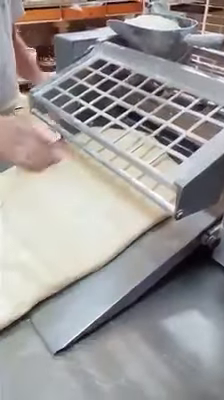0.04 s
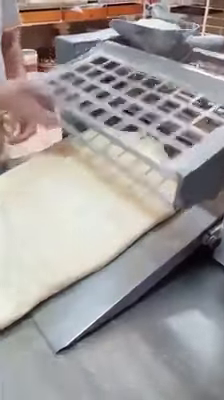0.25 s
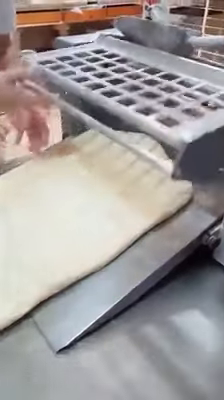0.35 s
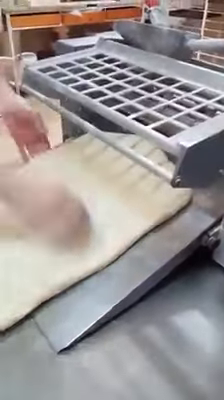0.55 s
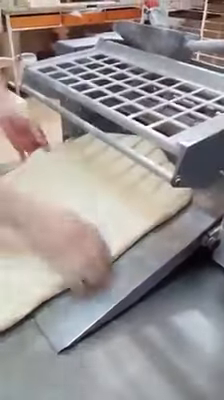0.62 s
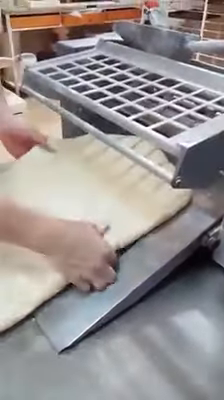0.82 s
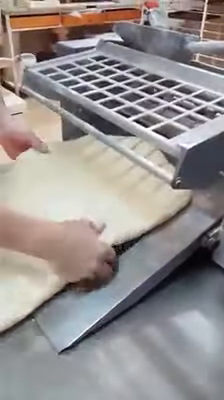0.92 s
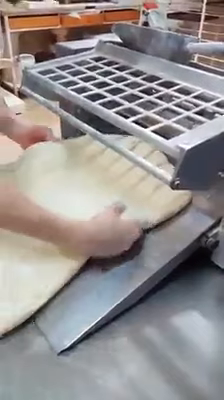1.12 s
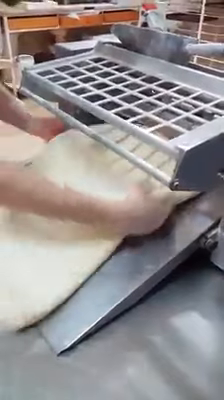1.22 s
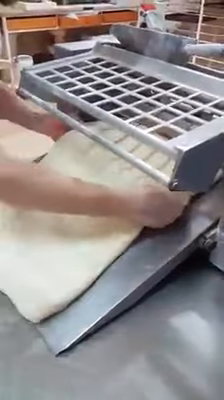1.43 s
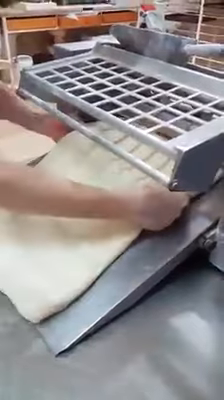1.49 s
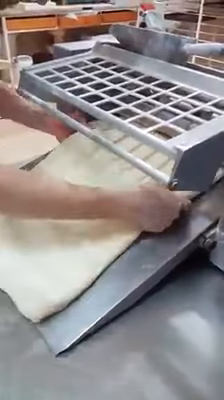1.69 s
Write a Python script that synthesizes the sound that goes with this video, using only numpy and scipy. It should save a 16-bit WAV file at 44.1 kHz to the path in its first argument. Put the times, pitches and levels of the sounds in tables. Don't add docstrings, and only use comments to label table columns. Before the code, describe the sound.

Sharp metal clang with quick rattling bounces over the low rumble and hiss of a dough-rolling machine, then soft dough sliding, a knock, a distant clink and a light tap; live hard room, phone a pace or two away.

```python
import sys
import numpy as np
from scipy import signal
from scipy.fft import rfft, irfft, dct
from scipy.io import wavfile

SR = 44100
rng = np.random.default_rng(int(sys.argv[2]) if len(sys.argv) > 2 else 0)


def to_wav(s):
    ch = np.atleast_2d(s).T
    pcm = np.round(np.clip(ch, -1, 1) * 32767)
    wavfile.write(sys.argv[1], SR, pcm.astype(np.int16))


def ratio_of_db(decibels):
    return 10 ** (np.asarray(decibels, float) / 20)


N = 77175
T = np.arange(N) / SR
F = np.fft.rfftfreq(N, 1 / SR) + 1e-3
LR = np.array([[1], [-1]])

KNOCK_S, TAP_S, TAP_DB = 1.3135, 1.501, -6
CLINK_S = 1.4165


def unit(x):
    return x / np.sqrt(np.mean(x ** 2))


def colour(x, points):
    hz, db = np.array(points).T
    return irfft(rfft(x) * ratio_of_db(np.interp(np.log(F), np.log(hz), db)), N)


def resonance(hz, width_hz):
    return 1 / (1 + 1j * (F - hz ** 2 / F) / width_hz) ** 2


def band(x, hz, width_hz):
    return irfft(rfft(x) * resonance(hz, width_hz), N)


def walk(rate_hz):
    spectrum = rfft(rng.standard_normal(N)) * (F > 0.1) / (1 + (F / rate_hz) ** 2)
    return unit(irfft(spectrum, N))


def pair(side_gain):
    mid, side = rng.standard_normal((2, N))
    return mid + LR * irfft(rfft(side) * side_gain, N)


def burst(at_s, len_s, rise=0.12):
    t = np.maximum(T - at_s, 0) / max(len_s, 1e-4)
    return (1 - np.exp(-t / rise)) * np.exp(-t)


def ring(t, hz, t60):
    return np.sin(2 * np.pi * hz * t) * 1000.0 ** (-t / t60)


def motor():
    # (frequency [Hz], level [dB])
    tones = [(98, -56), (113, -58), (151, -53.5), (199, -50.5), (301, -48.5), (350, -48), (432, -51.5),
             (576, -55), (598, -51), (630, -50), (764, -53.5), (830, -55.5), (881, -53)]
    # (frequency [Hz], width [Hz], level [dB])
    housing = [(104, 210, -18), (217.5, 154, -3.5), (373, 125, 1), (625, 296, -2.5), (782, 56, -6),
               (932, 218, -5.5)]
    # (time [s], level [dB], lean to the left [dB])
    load = [(0, 1.5, 1.5), (0.148, 1, 3), (.3, 4, 0), (.75, 2, -2.5), (.95, 1, -0.5), (1.03, 0, 1),
            (1.32, 4, -0.5), (1.5, 1.5, 2), (1.57, -0.5, 3.5), (1.658, 0.5, -1), (1.75, -1.5, 3.5)]
    wobble_db, wobble_hz, drift_rad, tone_side_db = 3.5, 7, 0.9, -21.5
    rumble_db, rumble_side_db, flicker_db = -41.5, -11.5, 1

    hum = 0
    for hz, db in tones:
        phase = 2 * np.pi * hz * T + drift_rad * walk(wobble_hz)
        size = np.sqrt(2) * ratio_of_db(db + wobble_db * walk(wobble_hz))
        side = ratio_of_db(tone_side_db) * np.sin(phase + 3 * walk(0.86))
        hum = hum + size * (np.sin(phase) + LR * side)

    rumble = 0
    for hz, width_hz, db in housing:
        noise = pair(ratio_of_db(rumble_side_db) * hz / 400)
        rumble = rumble + ratio_of_db(db + flicker_db * walk(18)) * unit(band(noise, hz, width_hz))

    s, db, lean_db = np.array(load).T
    load_db = np.interp(T, s, db) + LR * np.interp(T, s, lean_db) / 2
    return (hum + ratio_of_db(rumble_db) * rumble) * ratio_of_db(load_db)


def mesh():
    # (time [s], level [dB])
    swell = [(0, -52.5), (.14, -34.5), (.23, -38.5), (.6, -56), (.89, -45), (1.0, -41), (1.2, -45),
             (1.34, -34.5), (1.41, -43), (1.6, -43), (1.66, -34.5), (1.75, -40)]
    mesh_hz, drift_rad = 395.1, 0.4
    s, db = np.array(swell).T
    phase = 2 * np.pi * mesh_hz * T + drift_rad * walk(8)
    return np.sqrt(2) * ratio_of_db(np.interp(T, s, db)) * np.sin(phase)


def air():
    # (frequency [Hz], density [dB per Hz])
    hiss_colour = [(25, 10.5), (1000, -5.5), (1400, -2), (3300, -6), (6300, -18), (8000, -27),
                   (12300, -34.5), (14200, -54)]
    # (frequency [Hz], level [dB], stop [s])
    whistle = (12200, -82, .4)
    hiss_db, side_hz, flicker_db = -47, 1540, 0.75
    noise = pair(np.minimum(F / side_hz, 1) ** 3.4)
    hiss = unit(colour(noise, hiss_colour)) * ratio_of_db(hiss_db + flicker_db * walk(14))
    hz, db, stop_s = whistle
    return hiss + ratio_of_db(db) * np.sin(2 * np.pi * hz * T) * (T < stop_s)


def swing():
    swing_s, len_s, swing_hz, swing_db = 0.255, 0.09, 2800, -51
    swish = band(rng.standard_normal(N), swing_hz, 4000)
    swish = unit(band(swish, swing_hz, 4000))
    return ratio_of_db(swing_db) * swish * burst(swing_s, len_s)


def boom(at_s):
    # (frequency [Hz], level [dB], t60 [s])
    modes = [(70.6, -15.5, 0.72), (117.3, -14.5, 0.67), (173, -5.5, 0.12), (252.4, 1.5, 0.19),
             (276, -11, .08), (342.7, 7, 0.068), (507, -13, 0.13), (650, -15.5, 0.11), (803, 0.5, 0.051),
             (890, -2, 0.071), (990, 3.5, 0.061)]
    slam_s, soften_db_per_s = 0.378, -110
    rise_s, scatter_db = 0.0052, 1
    t = np.maximum(T - at_s, 0)
    luck = rng.standard_normal(len(modes))
    soft_db = soften_db_per_s * max(at_s - slam_s, 0)
    out = 0
    for k, (hz, db, t60) in enumerate(modes):
        sign = (-1) ** (k // 2)
        mode_db = db + scatter_db * luck[k] + soft_db * max(np.log2(hz / 260), 0)
        out = out + sign * ratio_of_db(mode_db) * ring(t, hz, t60)
    return (1 - np.exp(-t / rise_s)) * out


def blows():
    # (time [s], crack [dB], boom [dB], contact [s], hardness [dB per octave])
    hits = [(0.3202, -22.5, -48, 0.0045, 1.5), (.326, -27, -54, 0.016, 1), (0.336, -46.5, -53, 0.017, 2),
            (0.3695, -18, -45, 0.0094, 0.5), (0.3749, -13.5, -8, 0.0056, 1), (.385, -20, -20.5, 0.0071, -4),
            (0.397, -23.5, -11, 0.011, -3), (0.413, -27.5, -30, 0.0078, 1.5),
            (0.4382, -16, -14, 0.0036, -1.5), (0.446, -20.5, -22, 0.0061, 0.5), (.466, -29, -32, 0.01, -8),
            (0.488, -29.5, -16, 0.0065, -6), (.515, -31.5, -39, 0.012, -6), (0.544, -38, -38, 0.0089, -6),
            (0.578, -38, -30, 0.021, -0.5), (.615, -40.5, -31, 0.02, -3)]
    # (frequency [Hz], density [dB per Hz])
    crack_colour = [(120, -15), (400, -3), (1000, -1), (1800, -3.5), (2900, -2), (6500, -9.5), (8500, -21),
                    (15500, -38)]
    # (frequency [Hz], width [Hz], level [dB])
    bar_modes = [(1321, 41, -17), (1741, 56, -14.5), (2075, 15, -12), (2256, 21, -3), (2491, 49, -6),
                 (2717, 12, -6.5), (3090, 35, -7), (3342, 68, -6.5), (3512, 120, -1), (3985, 54, -2.5),
                 (4312, 34, -9), (4874, 26, -30.5), (5450, 24, -13.5), (6320, 210, -8)]
    bars_db, bars_scatter_db, rattle_db = -11, 5, 3.5
    boom_low_hz = 70

    spiky = rng.standard_normal(N) * ratio_of_db(2 * rng.exponential(size=N))
    grit = rfft(unit(colour(spiky, crack_colour)))
    bars = []
    for hz, width_hz, db in bar_modes:
        bar = grit * resonance(hz, width_hz)
        bars.append(ratio_of_db(db) * bar * np.linalg.norm(grit) / np.linalg.norm(bar))
    bars = np.array(bars)

    rattle = ratio_of_db(rattle_db * walk(110))
    luck = rng.standard_normal((len(hits), len(bars)))
    cracks = booms = 0
    for (s, crack_db, boom_db, contact_s, hard_db), mix in zip(hits, luck):
        tilt = ratio_of_db(hard_db * np.clip(np.log2(F / 3000), -2, 2))
        woken = ratio_of_db(bars_db + bars_scatter_db * mix) @ bars
        crack = irfft((grit + woken) * tilt, N)
        cracks = cracks + ratio_of_db(crack_db) * crack * rattle * burst(s, contact_s, rise=0.42)
        booms = booms + ratio_of_db(boom_db - 5) * boom(s)
    low_cut = signal.butter(2, boom_low_hz, "high", fs=SR, output="sos")
    return cracks, signal.sosfilt(low_cut, booms)


def squeak():
    squeak_s, len_s, squeak_hz, squeak_db = 0.3615, 0.012, 4400, -29
    tone = np.sin(2 * np.pi * squeak_hz * T + walk(300))
    swell = np.clip((T - squeak_s) / len_s, 0, 1) ** 0.5
    return ratio_of_db(squeak_db) * tone * swell * (T < squeak_s + len_s)


def drag():
    # (time [s], level [dB])
    pull = [
        (.55, -55.5),
        (.9, -72),
        (1.2, -53.5),
        (1.302, -51),
        (1.4, -47),
        (1.5, -59),
        (1.75, -60),
    ]
    # (frequency [Hz], density [dB per Hz])
    flour_colour = [(800, -32), (2000, 7), (3200, -2.5), (5000, -13.5), (11000, -26.5), (12200, -27.5),
                    (13000, -24), (14800, -50)]
    s, db = np.array(pull).T
    return unit(colour(pair(0.55), flour_colour)) * ratio_of_db(np.interp(T, s, db) + 1.3 * walk(12))


def thump(at_s):
    # (frequency [Hz], level [dB], t60 [s])
    top_modes = [(350, -29, .12), (760, -28, .1), (1250, -33, .05)]
    t = np.maximum(T - at_s, 0)
    return sum(-ratio_of_db(db) * ring(t, hz, t60) for hz, db, t60 in top_modes)


def knock():
    # (frequency [Hz], density [dB per Hz])
    knock_colour = [(250, -22), (400, -22), (780, 11), (1300, -8), (2000, -24), (3200, -17), (5000, -36),
                    (15000, -70)]
    knock_db, len_s = -30, 0.012
    contact = burst(KNOCK_S, len_s, rise=0.08) + ratio_of_db(TAP_DB) * burst(TAP_S, len_s / 2, rise=0.08)
    noise = unit(colour(rng.standard_normal(N), knock_colour))
    return ratio_of_db(knock_db) * noise * contact + thump(KNOCK_S) + ratio_of_db(TAP_DB) * thump(TAP_S)


def clink():
    # (frequency [Hz], density [dB per Hz])
    clink_colour = [(800, 2), (2100, 2), (2900, -7), (3900, 2.5), (4800, -5.5), (6500, -7), (8500, -19.5),
                    (15000, -28)]
    clink_db, len_s = -37, 0.025
    bounce_s, bounce_db = 0.014, -7
    contact = burst(CLINK_S, len_s, rise=0.037)
    contact = contact + ratio_of_db(bounce_db) * burst(CLINK_S + bounce_s, len_s, rise=0.1)
    return ratio_of_db(clink_db) * unit(colour(rng.standard_normal(N), clink_colour)) * contact


def clink_ring():
    ring_hz, ring_db, ring_t60_s = 14815, -73.5, 0.9
    return ratio_of_db(ring_db) * ring(np.maximum(T - CLINK_S, 0), ring_hz, ring_t60_s)


def room():
    # (frequency [Hz], t60 [s])
    decay = [(100, 0.92), (500, 0.57), (2000, 0.77), (5000, 0.64), (10000, 0.44), (15000, 0.5)]
    onset_s, side_hz, bass_hz = 0.001, 1200, 370
    noise = rfft(pair(np.minimum(F / side_hz, 1)))
    hz, t60 = np.array(decay).T
    tail = 0
    for centre in 60 * 2.0 ** np.arange(9):
        share = np.clip(1 - np.abs(np.log2(F / centre)), 0, 1)
        share = share * F / np.hypot(F, bass_hz)
        octave_t60 = np.interp(np.log(centre), np.log(hz), t60)
        tail = tail + irfft(noise * share, N) * 1000.0 ** (-T / octave_t60)
    tail = tail * (1 - np.exp(-T / onset_s))
    return tail / np.sqrt(np.sum(tail ** 2) / 2)


def scene():
    pan_db, treble_pan_db, pan_hz = 0.7, -27, 8100
    boom_lag_s, boom_send_db, early_lean_s = 0.0002, -4, 0.017
    machine = motor() + mesh() + air()
    cracks, booms = blows()
    hits = swing() + cracks + squeak()
    small = knock() + clink()

    lean = ratio_of_db(LR * (pan_db + treble_pan_db * F / (F + pan_hz)) / 2)
    lag = np.exp(1j * np.pi * LR * F * boom_lag_s)
    guard = irfft((rfft(hits) + rfft(booms) * lag) * lean, N)

    tail = room()
    early = np.exp(-T / early_lean_s)
    leaning = irfft(rfft(tail) * lean, N) * early + tail * (1 - early)
    guard_send = hits + ratio_of_db(boom_send_db) * booms
    wet = signal.fftconvolve(guard_send[None], leaning, axes=1)
    wet = wet + signal.fftconvolve(small[None], tail, axes=1)
    return machine + drag() + guard + small + clink_ring() + wet[:, :N]


def top_cut(x):
    return signal.sosfilt(signal.butter(12, 15940, fs=SR, output="sos"), x)


def record(dry):
    # (frequency [Hz], gain [dB])
    response = [(20, -14), (70, 0), (14500, 0), (15500, -3), (15800, -60)]
    hz, db = np.array(response).T
    gain = ratio_of_db(np.interp(np.log(np.linspace(1, SR / 2, N)), np.log(hz), db))
    heard = dct(dct(dry, norm="ortho") * gain, type=3, norm="ortho")
    return top_cut(heard)


dry = scene()
out = record(dry)
to_wav(out)
```